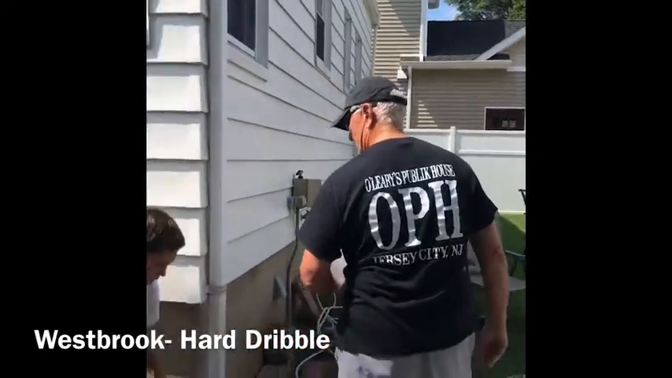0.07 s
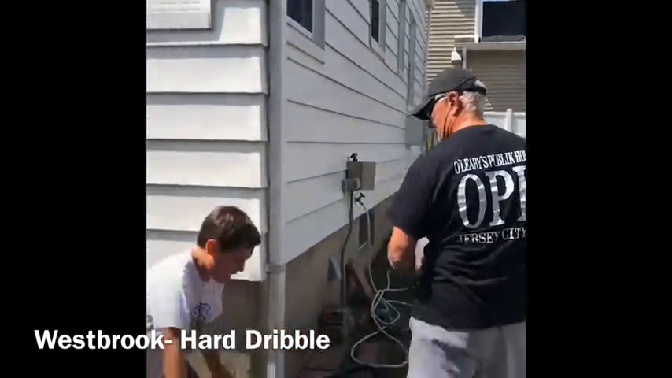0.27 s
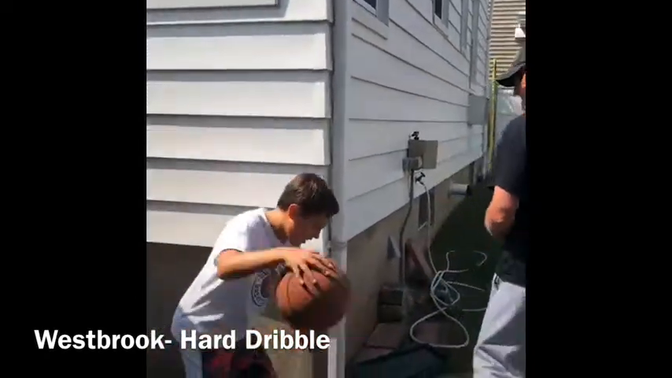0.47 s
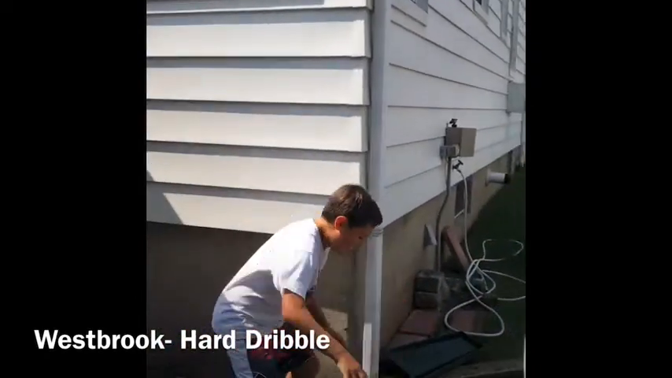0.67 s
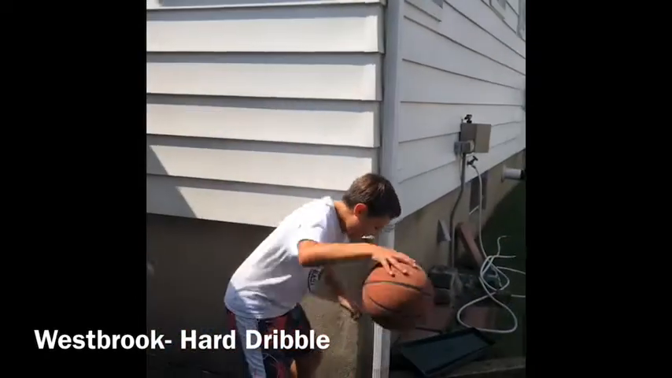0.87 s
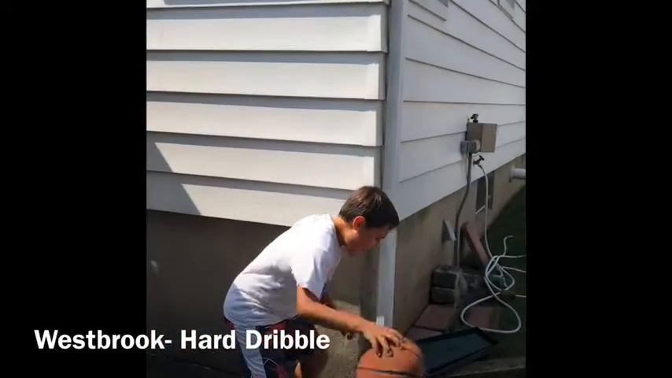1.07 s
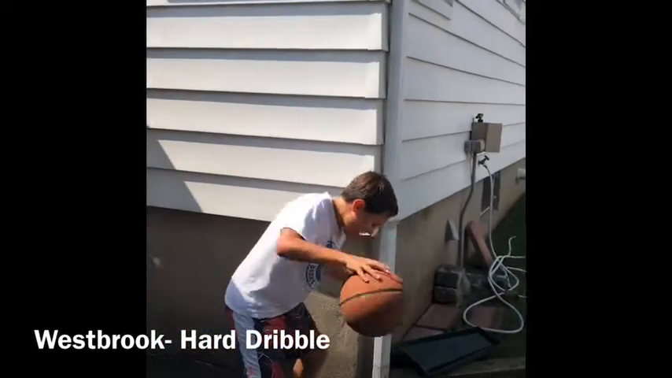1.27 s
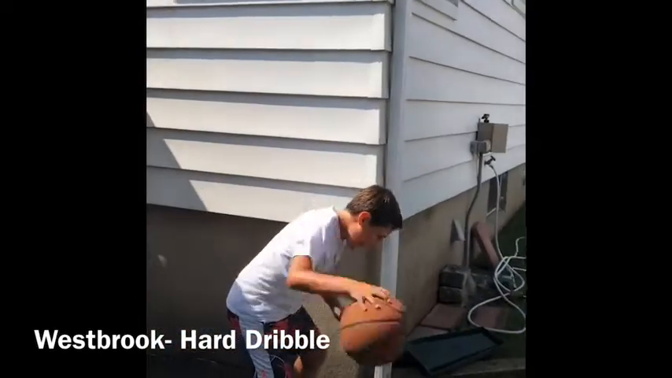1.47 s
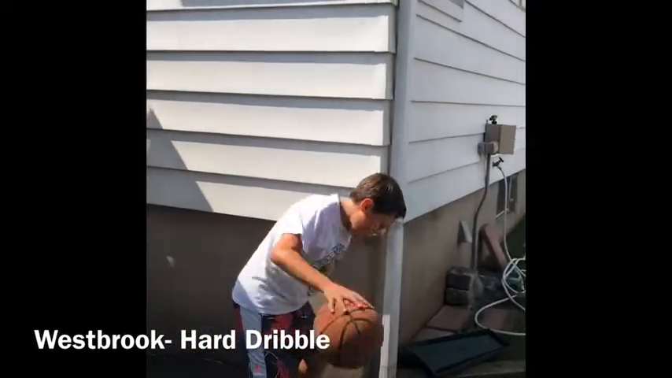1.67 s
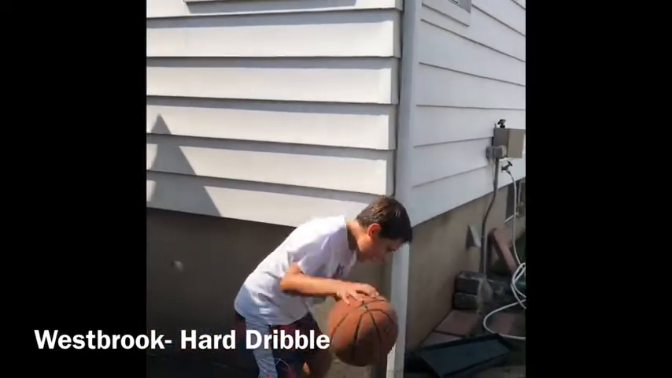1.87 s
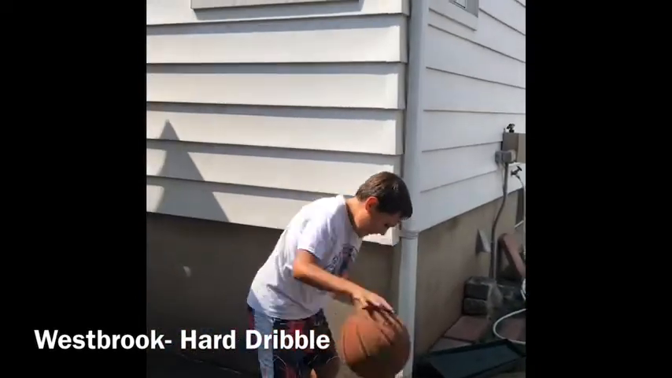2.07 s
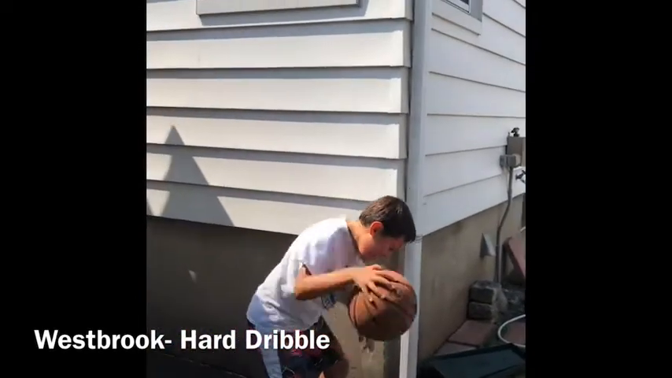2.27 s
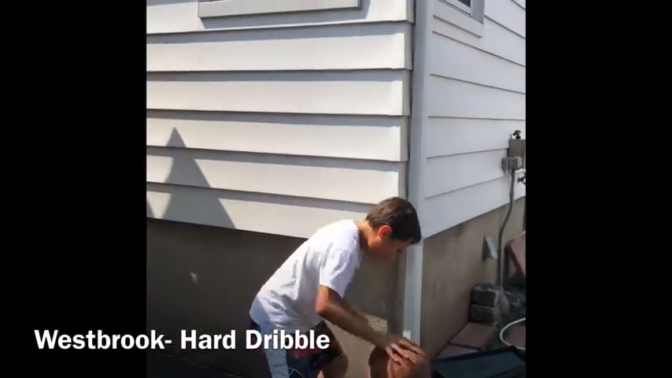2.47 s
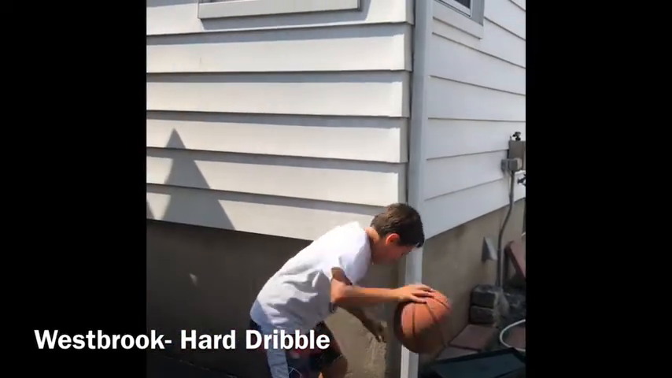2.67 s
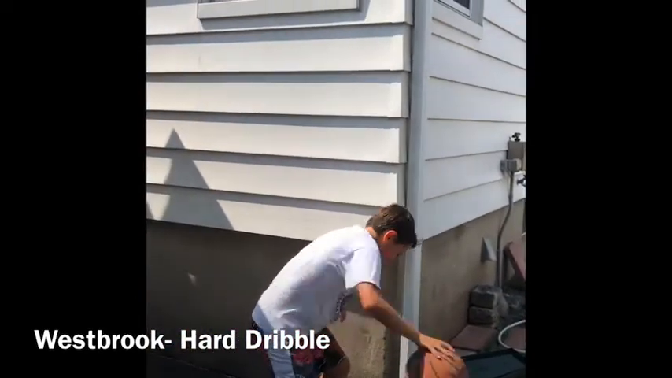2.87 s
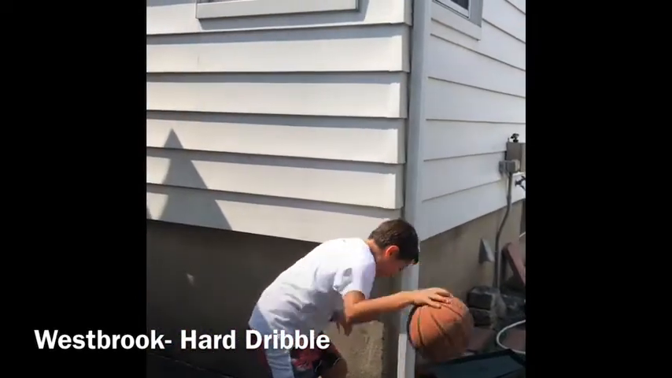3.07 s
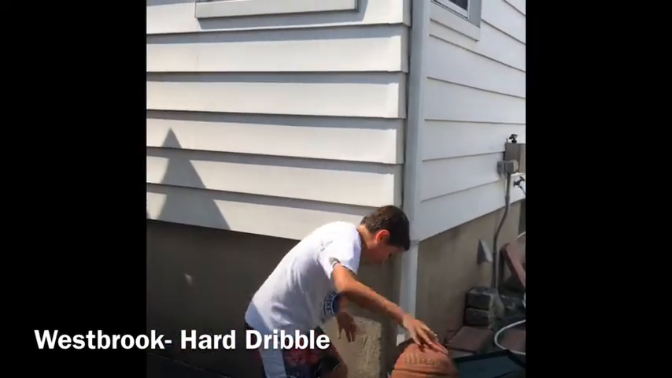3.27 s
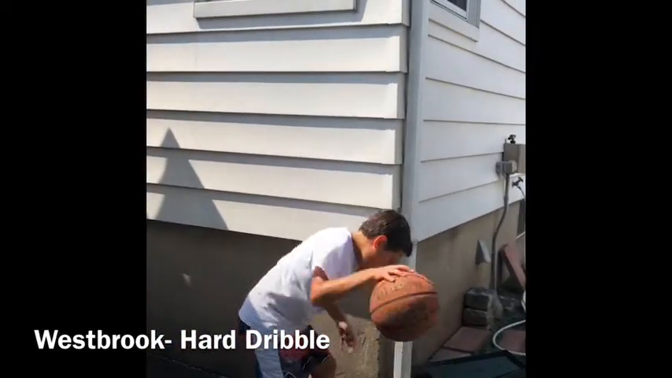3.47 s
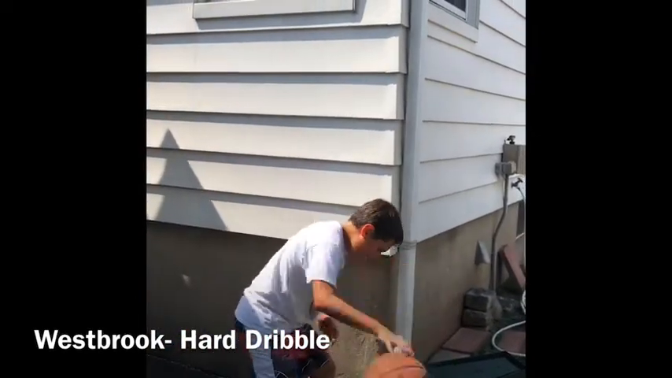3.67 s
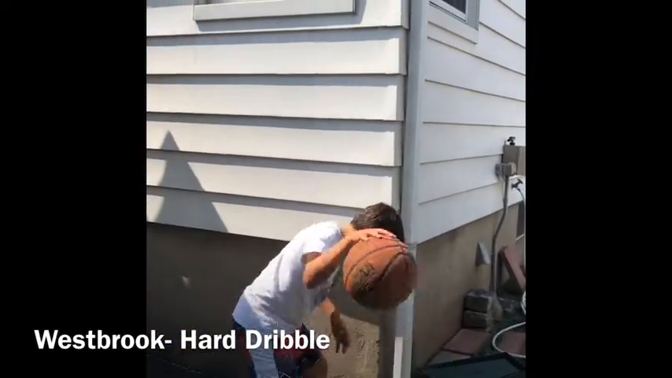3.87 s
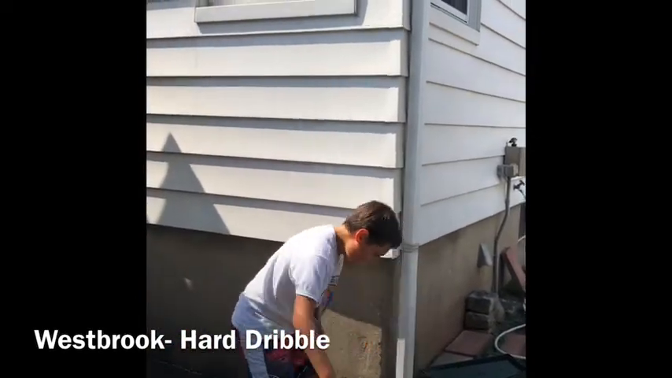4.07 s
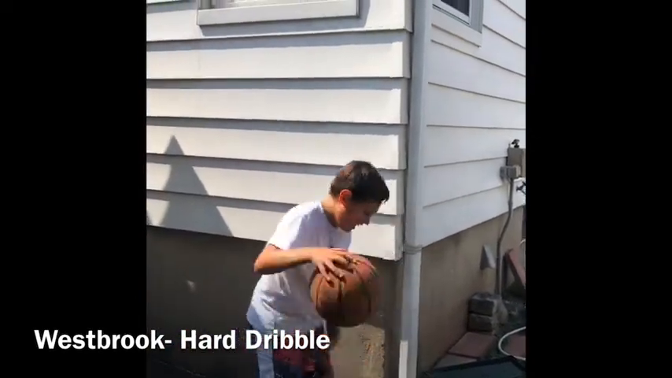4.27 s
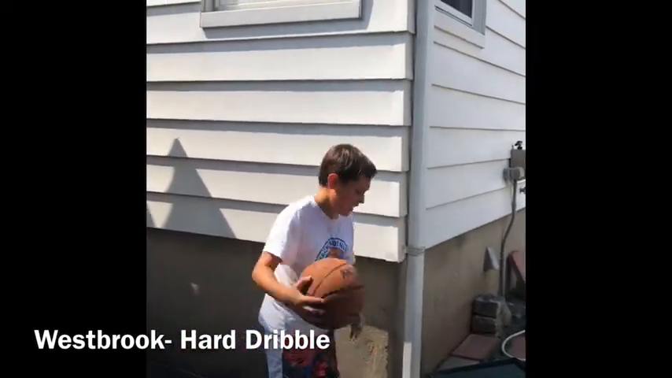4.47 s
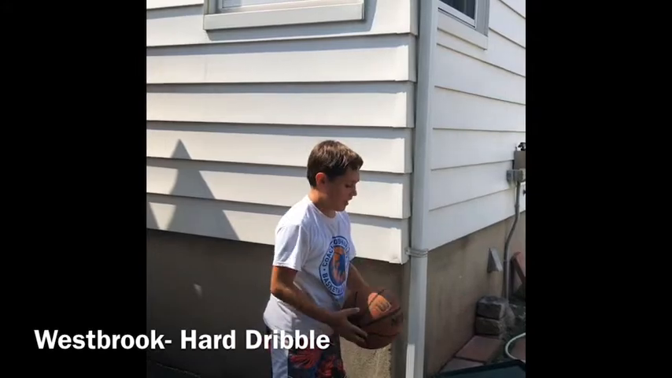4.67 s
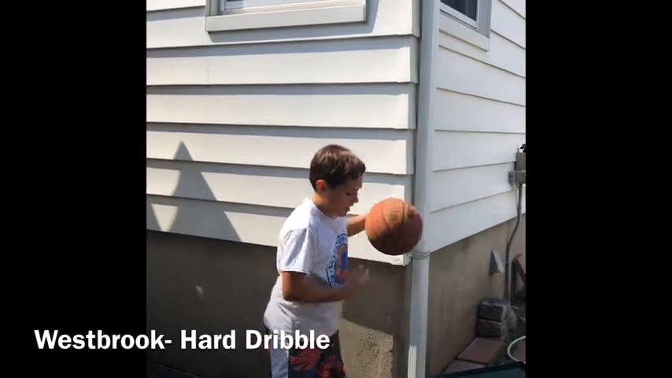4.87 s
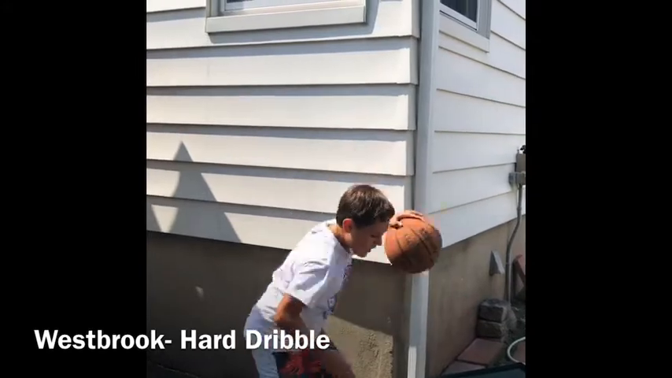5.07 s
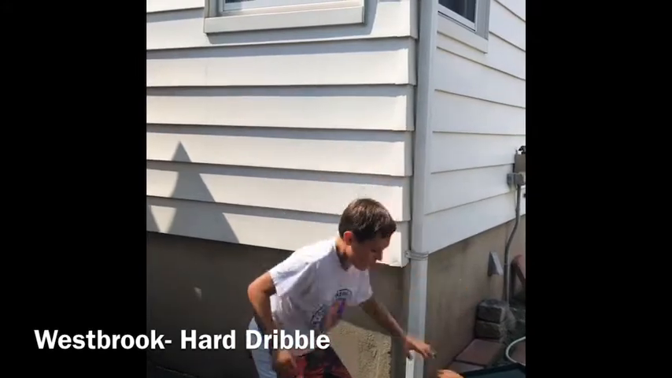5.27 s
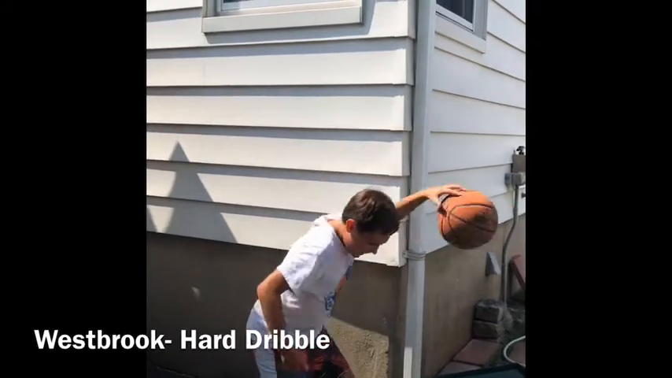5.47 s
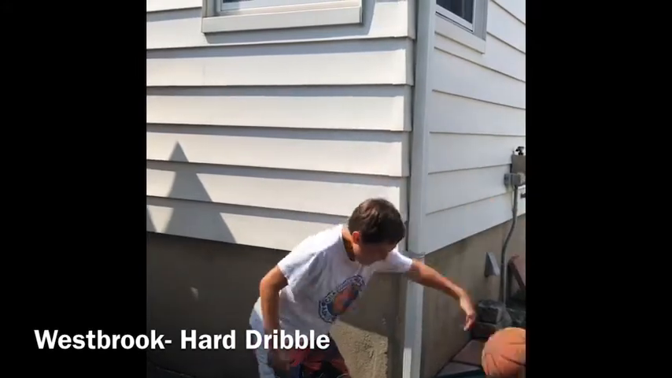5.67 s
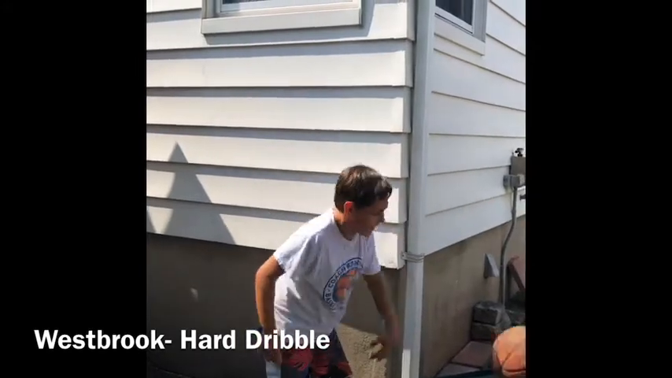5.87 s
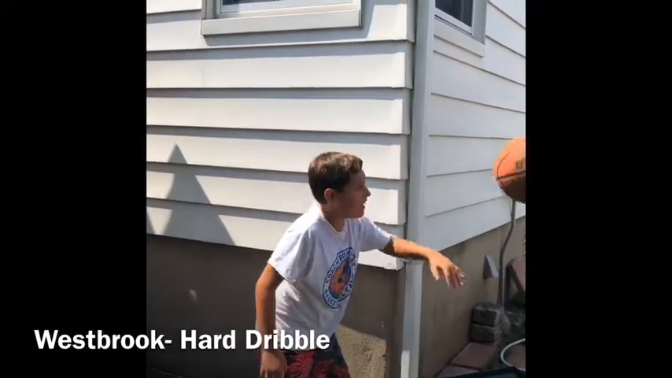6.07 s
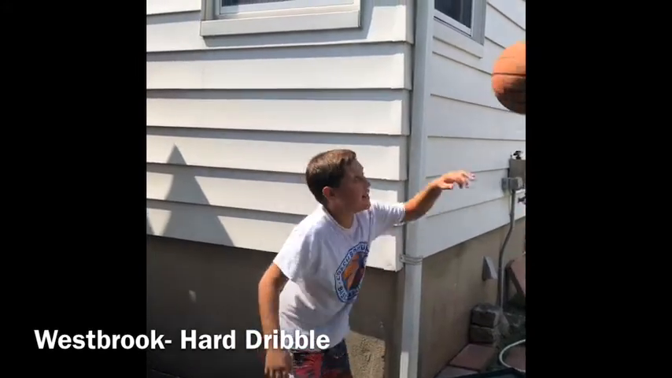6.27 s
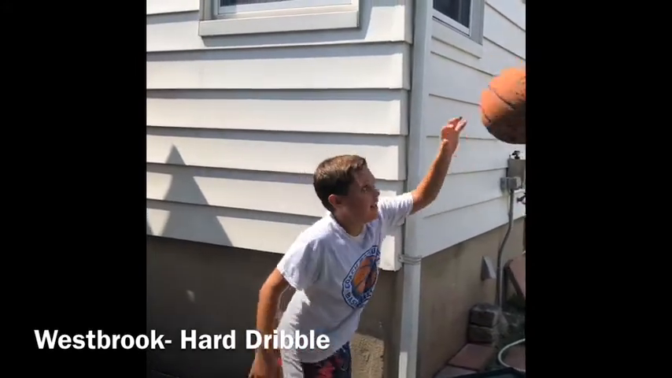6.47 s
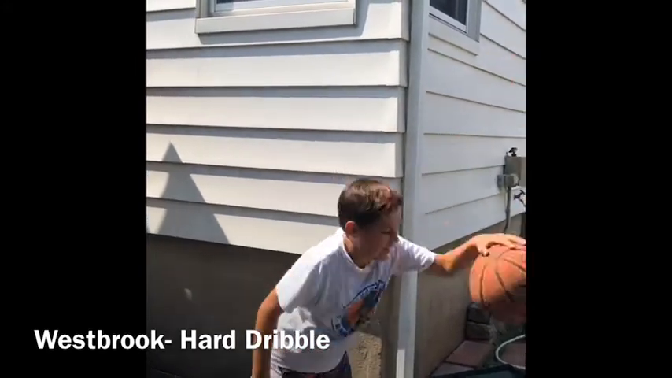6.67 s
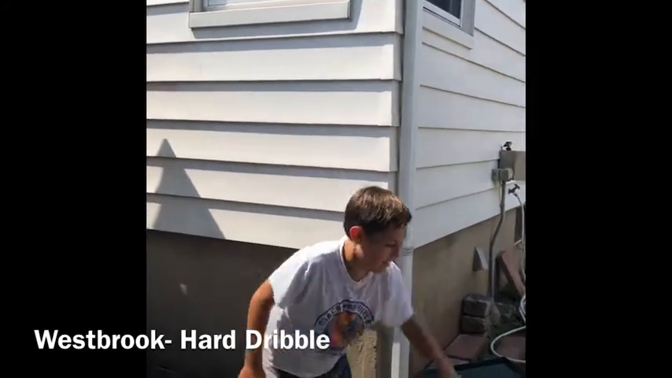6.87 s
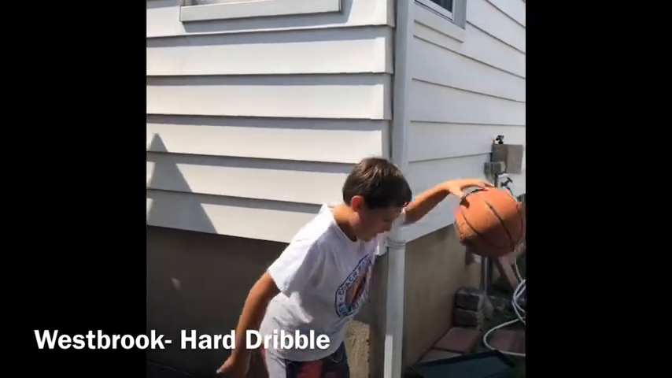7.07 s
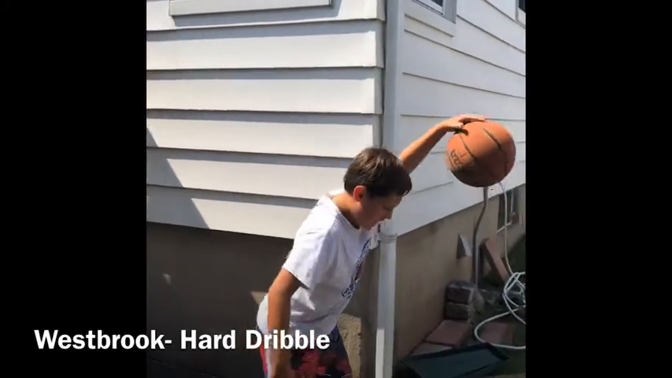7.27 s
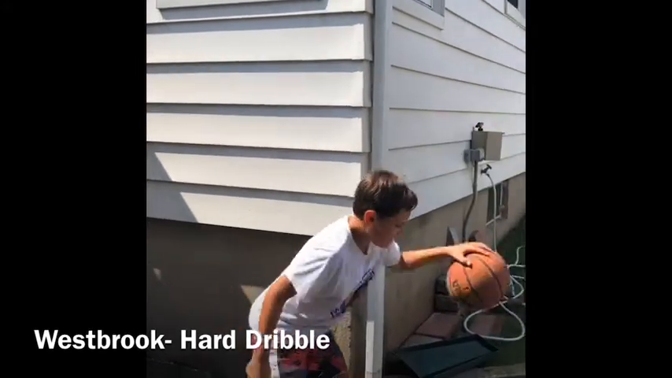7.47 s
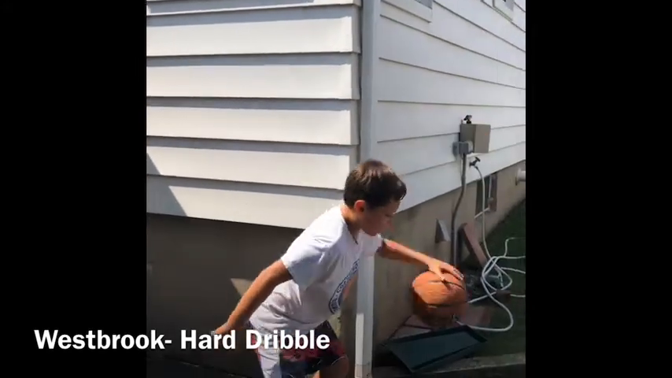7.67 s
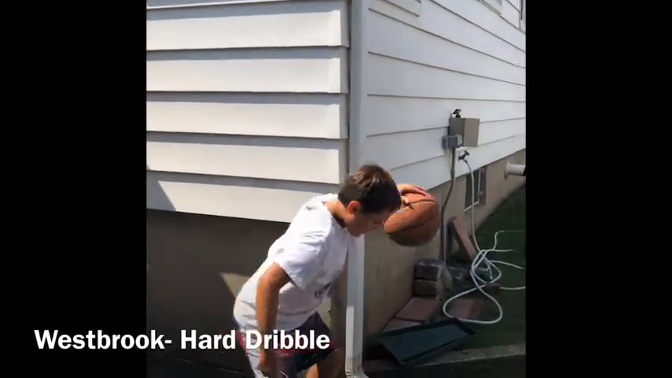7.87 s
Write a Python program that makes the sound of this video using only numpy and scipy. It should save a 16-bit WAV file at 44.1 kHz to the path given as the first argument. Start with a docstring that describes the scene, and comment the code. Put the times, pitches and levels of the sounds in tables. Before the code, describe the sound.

Hard, sharp basketball dribbles on outdoor concrete, steady at first, then a brief pause and slower uneven bounces, with light hand taps and faint insects.

```python
"""Basketball on concrete

A ball is dribbled hard beside a house wall, close to the microphone. Each bounce is a filtered crack,
a damped slap and a thump of falling pitch, with echoes from walls and yard; beating sines ring as the air in the ball.
Damped sines and noise bursts make the hands and shoes. Behind them: shaped noise for distant traffic
and clothes, pulsed noise bands for insects, a narrow noise band for a fan, and a drifting low sine.
"""
import sys
import numpy as np
from scipy import signal
from scipy.fft import rfft, irfft
from scipy.io import wavfile
from scipy.ndimage import uniform_filter1d

SR = 44100
rng = np.random.default_rng(int(sys.argv[2]) if len(sys.argv) > 2 else 0)


def store_wav(level_fs):
    """Save 16-bit WAV to argv[1]."""
    pcm = np.round(np.clip(np.atleast_2d(level_fs), -1, 1) * 32767)
    wavfile.write(sys.argv[1], SR, pcm.T.astype(np.int16))


def gain_from_db(level_db):
    """Turn a decibel level (scalar or array-like) into a linear amplitude factor."""
    decades = np.asarray(level_db, float) / 20
    return 10 ** decades


N = 348829  # samples

# Bounces of the ball. Each row: start in seconds, crack in dB, thump in dB, slap of the cover in dB,
# slap pitch in Hz, pitch of the snap at lift-off in Hz.
BOUNCES = [(0.3206, -4, -5, -15, 1575, 1360), (0.7542, -1, -5, -3, 1520, 1330),
           (1.1715, 3, -5, -7.5, 1540, 1210), (1.5932, 1, -6, -5, 1330, 1310),
           (1.9967, -1, -3.5, -10.5, 2480, 860), (2.4158, 1.5, -6, -7, 1330, 1300),
           (2.8159, -5, -7.5, 0, 1450, 1210), (3.2081, -1.5, -7, -1, 1450, 1274),
           (3.6167, 1.5, -4.5, -6, 1650, 970), (4.0797, -3, -7, -2, 1490, 720),
           (5.2535, 0, -5, -2.5, 2500, 920), (5.7834, -6.5, -7.5, -1, 1310, 1290),
           (6.846, -0.5, -4.5, 0, 1490, 1261), (7.6022, -1.5, -5.5, -0.5, 1440, 920)]


def evened(x):
    """Scales to an rms of 1."""
    return x / np.sqrt(np.mean(x ** 2) + 1e-20)


def read(points, hz):
    """Interpolates (Hz, value) points along log frequency."""
    f, value = np.transpose(points)
    return np.interp(np.log(hz + 1), np.log(f + 1), value)


def add(mix, start_s, sound):
    """Adds a sound in place, cut at the end of the mix."""
    part = mix[round(start_s * SR):][:len(sound)]
    part += sound[:len(part)]


def resonate(x, hz, width_hz):
    """Shifts hz down to zero, smooths, and shifts back: a resonance of gain 1."""
    turn = np.exp(2j * np.pi * np.cumsum(hz * np.ones(len(x))) / SR)
    r = np.exp(-np.pi * width_hz / SR)
    return 2 * (turn * signal.lfilter([1 - r], [1, -r], x / turn)).real


def colour(x, db_of_hz):
    """Shapes the spectrum, then scales to an rms of 1."""
    hz = np.fft.rfftfreq(len(x), 1 / SR)
    return evened(irfft(rfft(x) * gain_from_db(db_of_hz(hz)), len(x)))


def slow(per_s):
    """Noise of rms 1 that wanders about per_s times a second."""
    return evened(resonate(rng.standard_normal(N), 0, per_s))


def ping(hz, t60_s, t):
    """Sine that dies by 60 dB in t60_s."""
    return gain_from_db(-60 * t / t60_s) * np.sin(2 * np.pi * hz * t)


def sinking(from_hz, to_hz, sink_s, t60_s, t):
    """A ping whose pitch settles exponentially from one value to another."""
    cycles = to_hz * t + (from_hz - to_hz) * sink_s * (1 - np.exp(-t / sink_s))
    return gain_from_db(-60 * t / t60_s) * np.sin(2 * np.pi * cycles)


def causal(points):
    """Shortest (minimum-phase) click with the given spectrum, peak 1."""
    log_gain = np.log(gain_from_db(read(points, abs(np.fft.fftfreq(4096, 1 / SR)))))
    phase = -signal.hilbert(log_gain).imag
    click = np.fft.ifft(np.exp(log_gain + 1j * phase)).real[:2048]
    return click / abs(click).max()


def crack_of_contact():
    """First contact: one sharp spike, then the pebbled skin crackles down."""
    # Spectrum. Each row: frequency in Hz, relative level in dB per Hz.
    crack_spectrum = [(700, -15), (1500, -1), (3000, -5), (5500, -8), (8000, -12), (13000, -21),
                      (16000, -52)]
    t = np.arange(800) / SR
    decay = 0.3 * np.exp(-t / 0.0004) + 0.06 * np.exp(-t / 0.004)
    pebbles = rng.standard_normal(800) * decay
    pebbles[0] = -1
    return np.convolve(pebbles, causal(crack_spectrum))


def cover_slap(slap_hz, t):
    """The struck cover: a fast-sinking ping over its lower modes."""
    # Lower modes. Each row: frequency in Hz, level in dB, t60 in seconds.
    cover_modes = [(846, -6.5, 0.0099), (658, -16.5, 0.04)]
    slap = sinking(1.68 * slap_hz, slap_hz, 0.00033, 0.0079, t)
    return slap + sum(gain_from_db(db) * ping(hz, t60_s, t) for hz, db, t60_s in cover_modes)


def floor_thump(t):
    """The contact patch widens, so the pitch sinks; the push stops when the ball lifts off."""
    ms = 1000 * t
    pressed = (1 - np.exp(-ms / 4.5)) / (1 + np.exp((ms - 21.8) / 1.7))
    return pressed * np.cos(2 * np.pi * (1.94 * ms ** 0.35 - 0.27))


def slab_ring(t):
    """Low damped modes that build as the thump stops."""
    # Modes. Each row: centre of the random pitch in Hz, level in dB re thump, t60 in seconds.
    slab_modes = [(67.2, -15.5, 0.32), (96.24, -27, 0.72), (127.64, -24, 0.71), (148.65, -21.5, 0.5),
                  (205, -28, 0.14)]
    late = np.maximum(t - 0.017, 0)
    ring = sum(gain_from_db(db) * ping(hz * rng.uniform(0.9, 1.1), t60_s, late + rng.random() / hz)
               for hz, db, t60_s in slab_modes)
    return ring * np.minimum(late / 0.012, 1)


def yard_answer():
    """Scattered sound from walls and fences, each band dying at its own speed."""
    # Spectrum. Each row: frequency in Hz, relative level in dB per Hz.
    yard_spectrum = [(40, -51), (90, -47), (160, -10), (300, -9), (609, -11.5), (1090, -10.5),
                     (1490, -15.5), (1860, -16.5), (2810, -22), (5020, -24.5), (14600, -37), (16500, -63.5)]
    # Decay. Each row: frequency in Hz, t60 in seconds.
    yard_decay = [(60, 0.43), (160, 0.39), (420, 0.2), (1100, 0.28), (2900, 0.25), (7700, 0.2),
                  (14000, 0.14)]
    hz = np.fft.rfftfreq(256, 1 / SR)[:, None]
    t = np.arange(350) * 64 / SR
    real, imag = rng.standard_normal((350, 129, 2)).T
    lumps_db = 2.2 * rng.standard_normal((175, 1)).repeat(2, axis=0).T  # single surfaces stand out
    bins = (real + 1j * imag) * gain_from_db(lumps_db - 60 * t / read(yard_decay, hz))
    scattered = signal.istft(bins, nperseg=256, noverlap=192)[1][128:]
    rise = np.minimum(np.arange(len(scattered)) / (0.00076 * SR), 1)
    return colour(scattered, lambda f: read(yard_spectrum, f)) * rise


def bounce(crack_db, thump_db, slap_db, slap_hz, snap_hz, echo_db):
    """Impact of ball on concrete: crack, slap, thump, low ring, snap at lift-off, and echoes."""
    # Neighbouring walls return the thump. Each row: delay in seconds, level in dB re thump.
    house_echoes = [(.024, -13.5), (.064, -21), (.118, -29.5), (.18, -38.5), (.26, -41)]
    t = np.arange(SR // 2) / SR
    crack = crack_of_contact()
    thump = floor_thump(t)
    sound = gain_from_db(thump_db) * (thump + slab_ring(t))
    add(sound, 0.0003, gain_from_db(slap_db) * cover_slap(slap_hz, t))
    for delay_s, db in house_echoes:
        add(sound, delay_s, gain_from_db(thump_db + db) * thump)
    add(sound, 0.064, gain_from_db(thump_db - 48) * yard_answer())  # later, fainter, from across the yards
    add(sound, 0, gain_from_db(crack_db) * crack)
    add(sound, 0.011, -gain_from_db(thump_db - 1) * ping(snap_hz, 0.01, t))  # the cover snaps back at lift-off
    add(sound, 0.0382, gain_from_db(echo_db) * uniform_filter1d(crack, size=5))  # the far wall returns it duller
    add(sound, 0.001, gain_from_db(thump_db - 29.5) * yard_answer())
    return sound * np.minimum((t[-1] - t) / 0.15, 1)


def ball_air():
    """Modes of the enclosed air; each is a close pair, so it beats, and comes clear as the ball rises."""
    # Air modes. Each row: frequency in Hz, level in dB, t60 in seconds.
    air_modes = [(2296, -5.5, 0.82), (2560, -16, 0.94), (3000, -5, 1.86), (3686, -5, 1.19),
                 (3880, -13, 1.4), (4370, -12, 1.2), (4670, -8, 1.46), (5300, -16.5, 0.78)]
    # How the ball faces the microphone after each bounce, in order. Each row: level in dB,
    # tilt towards the high modes in dB per octave, seconds until it is clearest.
    facings = [(-56, 6.5, 0.1), (-61, -1, 0.11), (-57.5, 9, 0.18), (-56.5, 1.5, 0.11), (-59.5, -3, 0.23),
               (-56.5, -4, 0.18), (-61, -1, 0.16), (-56, 0, .09), (-54.5, 4, 0.092), (-59.5, -3, 0.061),
               (-54, -14, 0.12), (-63.5, -4, 0.14), (-58, 2, 0.16), (-59, -7, 0.17)]
    twin_db, spin_db = -6, 5  # weaker partner of each mode; swing as spin turns the modes away
    doppler_per_s, turn_s = 0.0352, 0.17  # pitch rises by this share a second as the ball turns back
    out = np.zeros(N)
    t = np.arange(SR) / SR
    heard = t + doppler_per_s * (t ** 2 / 2 - turn_s * t)
    tilt_hz = air_modes[2][0]
    ends_s = [row[0] for row in BOUNCES[1:]] + [N / SR]
    for (start_s, *_), end_s, (face_db, tilt_db, clear_s) in zip(BOUNCES, ends_s, facings):
        rising = np.sin(np.pi / 2 * np.minimum(t / clear_s, 1)) ** 2
        rising *= np.clip((end_s - start_s - t) / 0.02, 0, 1)
        for hz, db, t60_s in air_modes:
            split, a, b, spin = rng.random(4)
            twin_hz = hz + 8 + 30 * split
            pair = np.sin(2 * np.pi * (hz * heard + a))
            pair = pair + gain_from_db(twin_db) * np.sin(2 * np.pi * (twin_hz * heard + b))
            turn_db = spin_db * np.sin(2 * np.pi * ((4 + 5 * spin) * t + a))
            level_db = face_db + db + tilt_db * np.log2(hz / tilt_hz) - 60 * (t - clear_s) / t60_s
            add(out, start_s, gain_from_db(level_db + turn_db) * evened(pair) * rising)
    return out


def tap(knock_db, knock_hz, push_db, push_hz, tick_db):
    """A palm meets the cover: dull ping, low push, short tick and a puff of air."""
    t = np.arange(3000) / SR
    a, b, c = rng.standard_normal((3, len(t)))
    knock = ping(knock_hz, 0.024, t) + 0.24 * evened(resonate(a, knock_hz, 600)) * np.exp(-t / 0.027)
    push = sinking(1.7 * push_hz, push_hz, 0.0046, 0.045, t)  # sinks as the palm spreads
    tick = evened(resonate(b, 2700, 2000)) * np.exp(-t / 0.0079)
    puff = evened(resonate(resonate(c, 8300, 4000), 8300, 4000)) * np.exp(-t / 0.0062)
    return gain_from_db(knock_db) * knock + gain_from_db(push_db) * push + gain_from_db(tick_db) * (tick + gain_from_db(-8.5) * puff)


def scuff(db, length_s, tilt_db, squeak_hz, squeak_db):
    """Rubbing: grainy noise with a broad squeak and its overtone; it swells and fades."""
    t = np.arange(12000) / SR
    grain_db = 1.8 * rng.standard_normal(len(t) // 40)
    grains = rng.standard_normal(len(t)) * gain_from_db(grain_db).repeat(40)
    hiss = colour(grains, lambda f: tilt_db * np.log2(f / 3000 + 1.45) - 12 * np.log2(1 + 300 / (f + 1)))
    squeak = evened(resonate(grains, squeak_hz, 0.08 * squeak_hz))
    squeak += 0.5 * evened(resonate(grains, min(2.25 * squeak_hz, 15000), 490))  # overtone
    swell = np.minimum(t / (0.31 * length_s), 1) * np.exp(-(t / length_s) ** 1.5)
    return gain_from_db(db) * (hiss + gain_from_db(squeak_db) * squeak) * swell


def palm_swish():
    """The palm slides off the ball: a short bright scuff of varying level."""
    return scuff(-61 + 3 * rng.uniform(-1, 1), 0.028, 3, 11000, -6)


def clothes_rustle():
    """Shaped noise that flutters, and swells as the arm reaches after each bounce."""
    rest_db, reach_db, reach_s, flutter_db = -73.5, 12.5, 0.066, 5
    t = np.arange(N) / SR
    rustle = colour(rng.standard_normal(N), lambda f: -0.8 * np.log2(f / 1000 + 3))
    since = (t - np.array([[row[0]] for row in BOUNCES])).clip(0) / reach_s
    reach = (since * np.exp(1 - since)).max(axis=0)
    return rustle * gain_from_db(rest_db + reach_db * reach + flutter_db * slow(26))


def insect_band():
    """Noise bands pulsing together about 100 times a second."""
    # Bands. Each row: centre in Hz, width of each of two cascaded resonances in Hz, mean level in dB.
    insects = [(8184, 130, -63), (7690, 1000, -66)]
    pulses = 1 + 0.5 * np.sin(2 * np.pi * np.cumsum(100 + 2 * slow(0.82)) / SR)
    out = np.zeros(N)
    for hz, width_hz, db in insects:
        band = resonate(resonate(rng.standard_normal(N), hz, width_hz), hz, width_hz)
        out += gain_from_db(db + slow(4.9)) * evened(pulses * band)
    return out


def fan_hum():
    """A fan as one narrow resonance of noise."""
    return gain_from_db(-62) * evened(resonate(rng.standard_normal(N), 710, 35))


def low_hum():
    """A low sine of unsteady pitch and level drifts in late."""
    # Course. Each row: time in seconds, mean pitch in Hz, mean level in dB.
    hum_course = [(5.9, 209.4, -58), (6.3, 205.7, -60), (6.8, 202, -53.5), (7.05, 203.5, -58),
                  (7.2, 205, -47), (7.56, 203, -57), (7.699, 206.7, -40)]
    t = np.arange(N) / SR
    s, hz, db = np.transpose(hum_course)
    level_db = np.interp(t, s, db, -90, -90) + slow(3)
    pitch_hz = np.interp(t, s, hz) + 2 * slow(4)
    return gain_from_db(level_db) * evened(np.sin(2 * np.pi * np.cumsum(pitch_hz) / SR))


def traffic_wash():
    """Distant traffic: shaped noise of slightly wandering level."""
    # Spectrum. Each row: frequency in Hz, relative level in dB per Hz.
    wash_spectrum = [(25, -18), (40, -1), (60, 3), (110, 5), (177, -2), (230, -0.5), (321, -8.5),
                     (706, -13.5), (1180, -15.5), (3060, -25.5), (6300, -30), (8500, -20.5), (9300, -50),
                     (16500, -53)]
    wash = colour(rng.standard_normal(N), lambda f: read(wash_spectrum, f))
    return gain_from_db(-49.5 + 0.26 * slow(6.4)) * wash


def scene():
    """Places bounces, swishes, taps and scuffs over the background."""
    # Echo of each crack in dB, in order of the bounces, by where the ball lands.
    far_wall_db = [-13, -30, -14, -19, -38, -10, -43, -22, -13, -38, -41, -42, -19, -38]
    # Hands on the ball. Each row: start in seconds, knock in dB, knock pitch in Hz, push in dB,
    # pitch the push sinks to in Hz, tick in dB.
    taps = [(0.131, -37, 1530, -40.5, 300, -64), (0.247, -33.5, 1330, -37, 300, -64),
            (0.427, -29.5, 770, -35, 283, -40), (1.04, -41.5, 900, -40, 500, -66),
            (1.267, -34, 1430, -40, 300, -43), (2.128, -28, 1130, -26.5, 439, -39),
            (3.029, -58, 723, -58, 302.8, -55), (3.539, -63, 1260, -60, 293, -49),
            (4.634, -34.5, 1190, -31, 211, -59), (4.766, -52, 2680, -50, 300, -49.5),
            (5.585, -45, 786, -48.5, 600, -66), (6.193, -35, 1320, -30.5, 210, -38),
            (6.465, -35, 1010, -38, 621, -33), (7.022, -41, 1330, -57, 500, -47.5),
            (7.411, -55, 732, -52, 610, -60.5), (7.701, -33.5, 1114, -39, 300, -42.5)]
    # Shoes and palms rubbing; the first row, at the very start, is a brief insect chirp near 3.6 kHz. # Each
    # row: start in seconds, level in dB, length in seconds, # brightness in dB per octave, squeak in Hz, squeak
    # in dB over the hiss.
    scuffs = [(0, -65, 0.092, -14, 3600, 6.5), (.172, -46.5, 0.016, -17, 5450, -12),
              (.722, -42, 0.032, -26, 2360, -13), (1.14, -58, 0.029, -14, 2480, -8),
              (1.395, -45, 0.058, -17, 1960, -16), (1.87, -47, 0.037, -32, 1470, -10),
              (3.89, -61.5, 0.08, -3, 3030, -4), (4.19, -57, .025, -7.5, 11000, -9),
              (4.3, -60, 0.012, 10, 11000, -11), (4.445, -55, 0.027, 16, 10000, -11),
              (5.125, -47.5, 0.033, -14, 3400, -16), (5.73, -53.5, 0.074, -4, 1940, 4),
              (6.29, -64.5, 0.16, -15, 1990, 3), (6.461, -32.5, 0.042, -15.5, 674, -7.5),
              (6.645, -61.5, 0.011, -2, 436, 17.5), (6.74, -50, 0.12, -33, 1730, -1.5),
              (7.23, -63, 0.1, -5, 4470, -6), (7.58, -56, 0.017, -18, 2930, -4)]
    mix = ball_air() + clothes_rustle() + insect_band() + fan_hum() + low_hum() + traffic_wash()
    for (start_s, *row), echo_db in zip(BOUNCES, far_wall_db):
        add(mix, start_s, bounce(*row, echo_db))
        lead_s = 0.066 * (1 + 0.14 * rng.uniform(-1, 1))
        add(mix, start_s - lead_s, palm_swish())
    for start_s, *row in taps:
        add(mix, start_s, tap(*row))
    for start_s, *row in scuffs:
        add(mix, start_s, scuff(*row))
    return mix[None]


def top_cut(x):
    """Nothing passes above the cut-off."""
    return signal.sosfilt(signal.butter(12, 17030, fs=SR, output="sos"), x)


def record(dry):
    """The microphone drops the deepest bass; peaks meet a soft limit."""
    bass_cut = signal.butter(2, 58, "high", fs=SR, output="sos")
    heard = signal.sosfilt(bass_cut, dry)
    return top_cut(np.tanh(heard))


dry = scene()
out = record(dry)
store_wav(out)
```